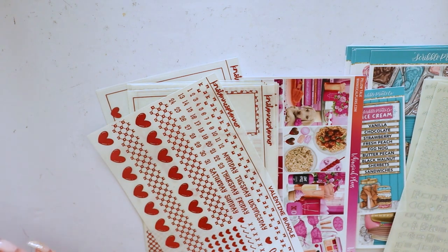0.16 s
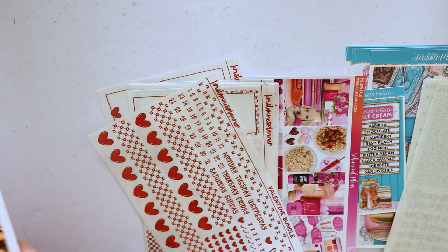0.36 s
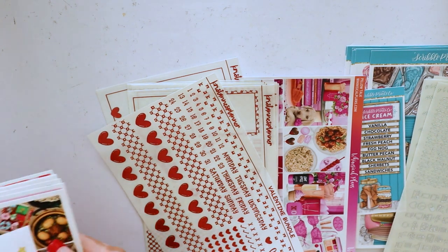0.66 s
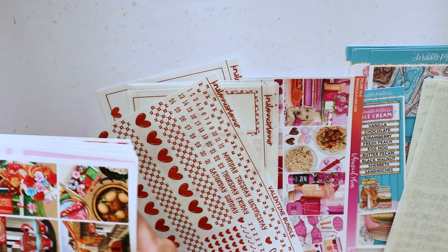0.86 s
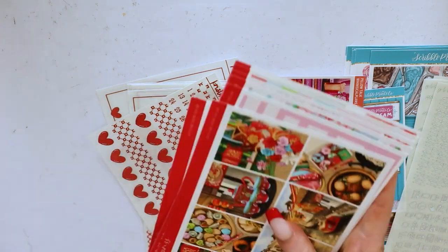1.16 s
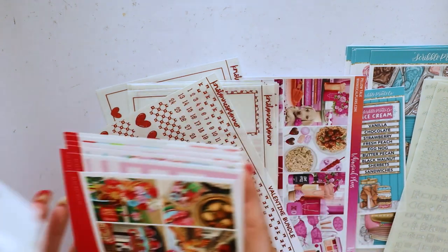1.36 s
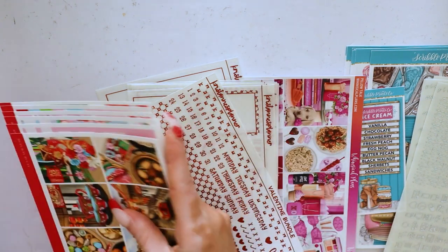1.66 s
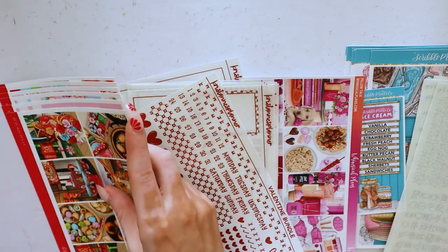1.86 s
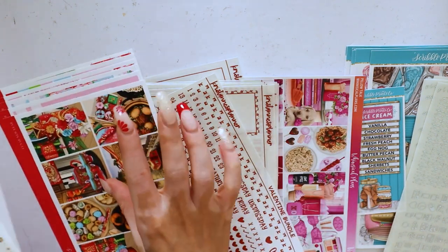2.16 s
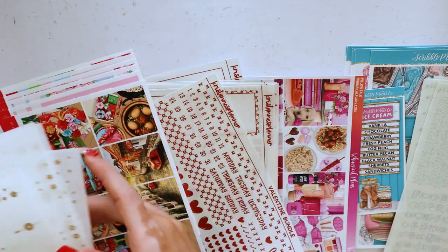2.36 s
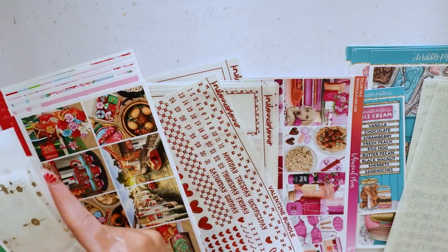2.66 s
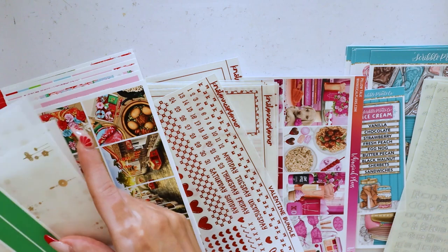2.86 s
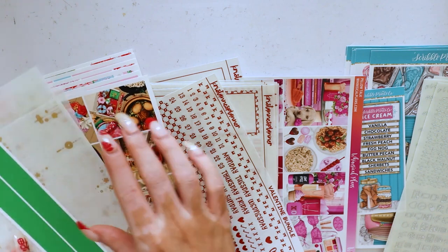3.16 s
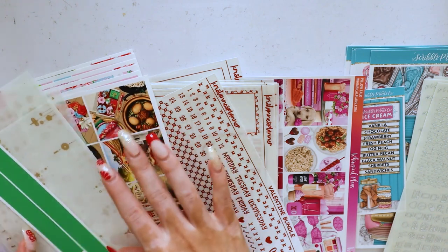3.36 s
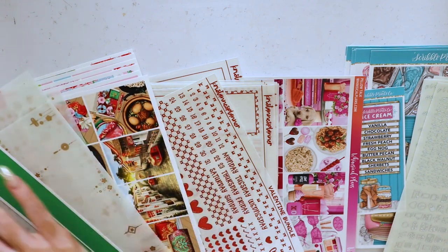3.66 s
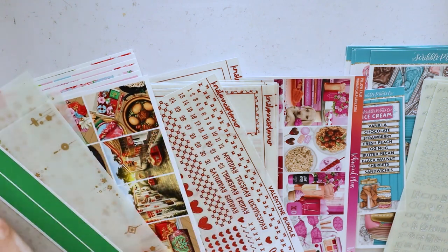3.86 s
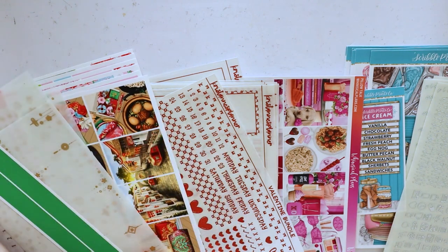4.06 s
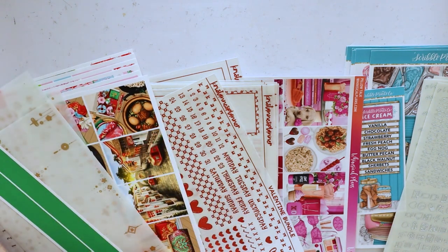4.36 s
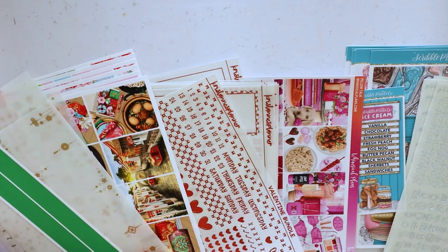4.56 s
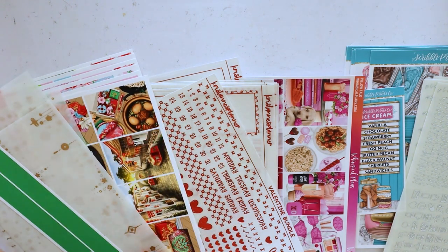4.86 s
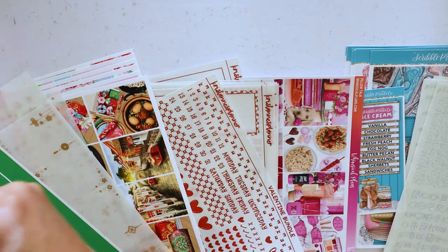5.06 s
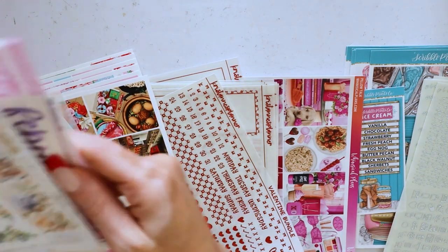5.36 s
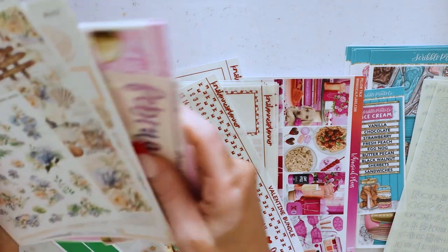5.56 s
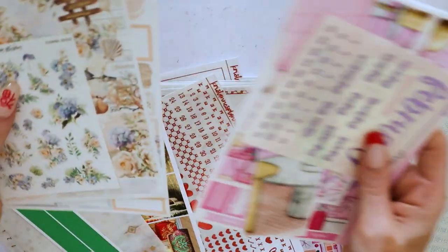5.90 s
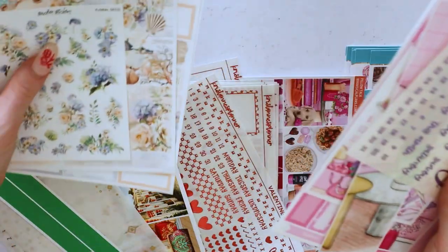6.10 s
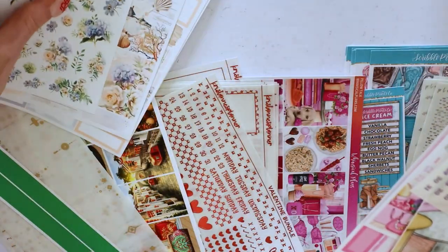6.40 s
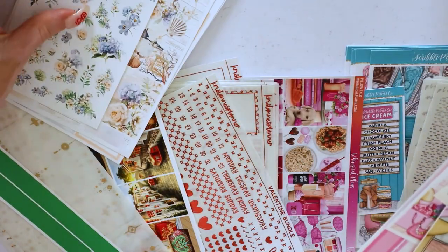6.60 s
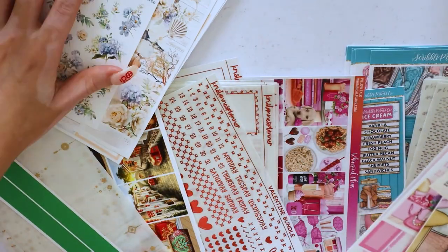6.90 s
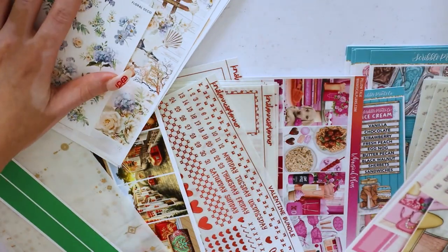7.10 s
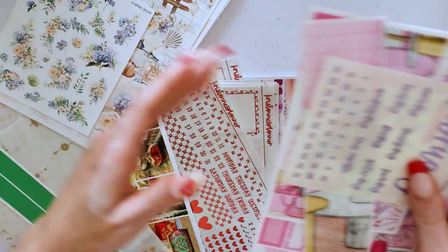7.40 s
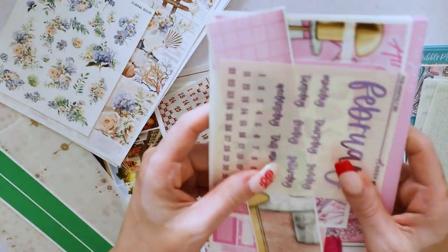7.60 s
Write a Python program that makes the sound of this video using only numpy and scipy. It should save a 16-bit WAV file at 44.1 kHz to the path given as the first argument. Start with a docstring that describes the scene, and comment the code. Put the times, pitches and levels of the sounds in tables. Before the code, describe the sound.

A small, quiet room with faint air and a barely audible low hum, heard by a wide stereo microphone close above a desk. At 0.1-0.2 s a sheet slides with a bright hiss and its edge snaps; more flicks and a short gliding pull follow at 0.5-0.7 s. Around 1.2-1.6 s a rising drag becomes a lower, hollow scuff of the whole stack, with a thin skin rasp. From 1.9 to 3.2 s edges tap and click in small clusters, with soft desk thumps near 2.2 s. A duller scuff at 3.6 s precedes a bright slap at 3.85 s and crackling pulls until 4.6 s. Mostly quiet follows, with a tick at 5.05 s. Rustles and taps return at 5.5-5.95 s; strong crisp landings come at 6.67 and 6.98 s, the latter loudest, then near silence and a light tap at 7.64 s.

```python
"""A low hum and faint air come first, with a whisper of skin on paper; then a sheet slides and its edge snaps.
Paper sticker sheets are slid over each other, fanned out and laid on a desk in a small quiet room.
Each slide is a swell of tiny slips that hiss and make the sheet resonate; freed edges are sharp pulses,
skin rasps are narrow noise bands and desk thumps are low decaying sines.
A wide stereo microphone close above the desk hears it all."""
import sys
import numpy as np
from scipy import signal
from scipy.fft import rfft, irfft, next_fast_len
from scipy.io import wavfile
from scipy.ndimage import uniform_filter1d

SR = 44100
rng = np.random.default_rng(int(sys.argv[2]) if len(sys.argv) > 2 else 0)


def wav_out(sig):
    """Save sig, one row per channel (or a flat mono array), as 16-bit PCM at SR to the path in sys.argv[1]."""
    wavfile.write(sys.argv[1], SR, np.round(np.clip(np.atleast_2d(sig).T, -1, 1) * 32767).astype(np.int16))


N = 341334

# Sheet, hiss, tap and crack levels are filter gains, ahead of the near and room gains of the microphone.

# Still air of the room. Each row: frequency in Hz, relative level in dB per Hz.
AIR_SPECTRUM = [(25, -10), (60, -6.5), (80, -16.5), (120, -13.5), (250, -23), (700, -25), (3000, -36.5),
                (12000, -49)]
# Low hum in the background. Each row: frequency in Hz, level in dB.
HUM_TONES = [(101.5, -71.5)]
# Likeness of left and right in the room's sound. Each row: frequency in Hz, correlation from -1 to 1.
ROOM_LIKENESS = [(190, .98), (1500, -.15), (10000, -.65)]
# Standing waves of the room. Each row: frequency in Hz, level in dB before ROOM_DB, 60 dB decay in seconds.
STANDING_WAVES = [(361, -63, 0.26), (476, -58, .22), (658, -54.5, 0.16), (1160, -55, 0.2),
                  (1214, -65, 0.28)]
# Lead of the nearer channel for close sound. Each row: frequency in Hz, phase in radians.
NEAR_CHANNEL_LEAD = [(1050, 0), (2000, 2.3), (10000, 2.55)]
# Directivity of the microphone. Each row: frequency in Hz, share of a source's left-right dB that it shows.
MIC_DIRECTIVITY = [(350, .05), (1400, 2.06), (10000, 0.56)]
# Where the hands work. Each row: time in seconds, left minus right in dB.
HAND_POSITION = [(.2, -8), (.8, -8), (1.3, 3.5), (1.8, -8), (3.43, -8.5), (3.6, 1.5), (3.82, 0),
                 (4.15, -13.5), (4.55, -2.5), (5.1, -7.5), (5.55, -15), (5.9, 2.5), (6.5, -6.5),
                 (6.7, -3.5), (6.98, -7.5), (7.005, 0), (7.65, 2)]
# A sheet around its resonance. Each row: ratio to the resonance, relative level in dB per Hz at focus 1.
SHEET_RESPONSE = [(.1, -42), (.45, -22), (.75, -8), (1, 0.5), (1.5, -9), (2.5, -15), (6, -32), (20, -50.5)]
# Friction of paper on paper. Each row: frequency in Hz, relative level in dB per Hz.
FRICTION_HISS = [(300, -9), (1500, -12), (3000, -4), (6000, 3), (10500, 9.5)]
# Fingers shift lightly on the held sheets. Each row: start in seconds, end in seconds, drive level in dB.
FINGER_SHIFTS = [(-.1, 0.072, -52.5), (.6, 2.2, -64), (2.605, 3.328, -65), (4.6, 6.094, -65),
                 (6.251, 6.374, -57.5)]
# A sheet is pushed a short way. Each row: peak in seconds, time scale in seconds, sheet level in dB,
# sheet resonance in Hz, hiss level in dB, focus of the resonance (higher is more taut).
SHEET_PUSHES = [(0.158, 0.074, -39, 2400, -33.5, 0.44), (0.214, 0.014, -42, 2470, -27.5, 1.8),
                (0.505, 0.063, -49.5, 1990, -33.5, 1.2), (0.171, 0.1, -56.5, 833, -53, 2.1),
                (1.122, 0.013, -66.5, 1360, -44.5, 1.6), (1.616, 0.057, -67, 1030, -78, 1.2),
                (1.932, 0.035, -47.5, 1100, -41.5, 0.4), (2.051, 0.059, -65, 4130, -47, 1.4),
                (2.145, 0.15, -67, 2320, -69, 1), (2.545, 0.052, -51.5, 4730, -49.5, 2.6),
                (2.826, 0.013, -50, 4700, -37.5, 1.3), (3.095, 0.043, -48.5, 1190, -40, 0.77),
                (4.542, 0.047, -38, 2620, -34.5, 0.72), (4.663, 0.058, -53.5, 1750, -43.5, 1.06),
                (5.55, 0.054, -56.5, 2505, -70, 1.8), (5.724, 0.11, -44.5, 5600, -32.5, 1.04),
                (5.919, 0.076, -72, 700, -50.5, 1), (6.505, 0.086, -45.5, 1780, -49, 1.1),
                (6.56, 0.07, -56, 2030, -54.5, 2.3), (6.663, 0.091, -59, 4500, -41, 1.3),
                (6.742, 0.013, -39.5, 3160, -58, 1.14), (7.67, 0.08, -64.5, 2650, -44, 6)]
# Edges that flick free. Each row: start in seconds, sheet level in dB, sheet resonance in Hz, crack level in dB.
EDGE_FLICKS = [(0.1733, -29, 3100, -31), (0.4868, -34, 2100, -32), (0.4964, -27, 2095, -51),
               (0.534, -39, 2300, -58), (0.811, -65, 2370, -36.5), (1.9095, -34.5, 890, -36.5),
               (2.2052, -43, 1365, -35), (2.536, -52.5, 1200, -38.5), (2.5665, -55, 1360, -33.5),
               (2.6288, -38, 5560, -30), (2.659, -55, 1470, -54), (2.7657, -36, 1110, -34.5),
               (3.152, -39, 1380, -39), (3.8494, -39, 1680, -49), (3.883, -47, 2080, -29.5),
               (4.295, -35, 1570, -45), (4.6879, -43, 1660, -53), (5.0561, -35, 3030, -47),
               (5.745, -32, 1046, -38), (5.945, -59.5, 7000, -44), (6.4905, -34.5, 1850, -55),
               (6.962, -35.5, 1850, -35), (6.9863, -19.5, 2380, -40), (6.9873, -17, 2130, -43),
               (6.9947, -32.5, 955, -52), (7.64, -47.5, 2500, -56)]
# Drawn sounds with a gliding resonance, one list each; the last two lists are one long pull that changes
# pitch. Each row: time in seconds, sheet level in dB before DRAG_SHEET_DB,
# hiss level in dB before DRAG_HISS_DB, sheet resonance in Hz.
GLIDING_PULLS = [
    [(1.225, -61.5, -73, 493), (1.25, -52, -67, 600), (1.275, -50.5, -50, 720)],
    [(0.52, -52, -74, 1920), (0.562, -51.5, -55, 2380), (0.7, -59.5, -57, 2840), (0.76, -98, -73.5, 2300)],
    [(3.88, -45, -56, 1970), (3.928, -41, -50, 2770), (3.998, -46.5, -49.5, 2400), (4.09, -51.5, -47, 2560),
     (4.165, -42, -40, 3070)],
    [(4.23, -45, -51, 1650), (4.29, -50, -52.5, 1620), (4.38, -64, -61, 2700), (4.48, -72, -71, 2120)],
]
# Skin dragged over a glossy sheet. Each row: peak in seconds, half length in seconds, level in dB.
SKIN_RASPS = [(1.316, 0.046, -42.5), (3.29, 0.17, -64)]
# The whole stack scuffs over the desk. Each row: peak in seconds, time scale in seconds, lower resonance
# level in dB, its frequency in Hz, upper resonance level in dB, its frequency in Hz, hiss level in dB.
STACK_SCUFFS = [(1.334, 0.091, -40, 547, -40.5, 1230, -45.5), (3.594, 0.063, -35, 482, -37.5, 1175, -73)]
# An edge lands and the sheet settles. Each row: landing in seconds, tap level in dB, sheet resonance in Hz,
# crack level in dB, settling sheet level in dB, settling hiss level in dB.
SHEET_LANDINGS = [(1.466, -60.5, 1030, -46, -57, -41.5), (1.9013, -41, 860, -42.5, -40.5, -41),
                  (2.2023, -41, 730, -34, -47.5, -52.5), (2.5736, -44.5, 1310, -26.5, -47.5, -55),
                  (2.7528, -39.5, 1150, -34, -42, -45), (3.149, -36, 1360, -33, -46, -37),
                  (3.4314, -37.5, 3330, -34.5, -63, -51), (3.81, -35, 2140, -22, -41, -29.5),
                  (3.8466, -18.5, 1980, -25.5, -21.5, -51), (4.2147, -28.5, 1220, -46, -40.5, -47),
                  (4.515, -27, 1830, -27.5, -35.5, -40), (5.0554, -38, 950, -39.5, -47.5, -35.5),
                  (5.7174, -28, 920, -28.5, -45.5, -28.5), (6.662, -16, 2216, -41, -28, -54),
                  (6.6704, -30, 730, -32.5, -42, -65), (6.9779, -16, 2200, -27, -19, -28),
                  (7.6411, -39.5, 950, -46, -45, -59)]
# Hand or stack meets the desk. Each row: start in seconds, gain in dB.
DESK_BLOWS = [(1.906, -57.5), (2.208, -39.5), (2.237, -36), (3.152, -42.5), (3.85, -47.5), (6.669, -38),
              (6.697, -53.5)]
# Resonances of the desk. Each row: frequency in Hz, relative level in dB, 60 dB decay in seconds.
DESK_MODES = [(101.3, -18.5, 0.33), (137.6, 0, .2)]

AIR_DB, ROOM_T60_S, ROOM_DB, NEAR_DB = -65.5, 0.15, -0.5, -3
SHEET_RIPPLE_DB, SHEET_MODE_GAP_HZ = 1.8, 230   # random bumps in a sheet's response
SPEED_UP_SHARE = 0.6   # part of a push's time scale spent gathering speed
DRAG_SHEET_DB, DRAG_HISS_DB, DRAG_FADE_S = 1, 9, 0.069
DRAG_FOCUS, DRAG_RUMBLE_DB = 0.97, -14
RASP_BAND_HZ = (5200, 6100)
STACK_FOCUS = 0.87   # how narrowly the stack rings
SETTLE_ATTACK_S, SETTLE_HOLD_S, SETTLE_DECAY_S = 0.027, 0.0037, 0.026
TAP_SWELL_DB, TAP_SWELL_S = -9, 0.0066   # soft swell and fade around each tap
TREBLE_EDGE_HZ, CUTOFF_HZ = 11560, 15600


def from_db(db):
    """Decibels to gain."""
    return 10 ** (np.asarray(db) / 20)


def rms_one(x):
    """Scale to unit rms."""
    return x / np.sqrt(np.mean(x ** 2) + 1e-20)


def bins(size):
    """Frequencies of a spectrum of this many samples, in Hz."""
    return np.maximum(np.fft.rfftfreq(size, 1 / SR), 1)


def at_hz(points, hz):
    """Read a table on a log-frequency axis."""
    points = np.array(points)
    return np.interp(np.log(hz), np.log(points[:, 0]), points[:, 1])


def add(out, x, s):
    """Mix x into out from time s on."""
    at = int(round(s * SR))
    first, last = max(at, 0), min(at + x.shape[-1], N)
    if last > first:
        out[..., first:last] += x[..., first - at:last - at]


def diffuse(size):
    """Spectrum of white stereo noise, alike in the bass and opposed in the treble."""
    alike = np.clip(at_hz(ROOM_LIKENESS, bins(size)), -1, 1)
    mid, side = rfft(rng.standard_normal((2, size)))
    return (np.sqrt(1 + alike) * mid + np.sqrt(1 - alike) * side * [[1], [-1]]) / np.sqrt(2)


def background(waver=0.56):
    """Faint air noise and a wavering hum."""
    t = np.arange(N) / SR
    air = from_db(AIR_DB) * rms_one(irfft(diffuse(N) * from_db(at_hz(AIR_SPECTRUM, bins(N))), N))
    for hz, db in HUM_TONES:
        drift = rng.standard_normal(80) + 1j * rng.standard_normal(80)
        sway = 1 + waver * signal.resample(drift, N)
        air = air + from_db(db) * rms_one(np.real(sway * np.exp(2j * np.pi * hz * t)))
    return air


def ring(modes):
    """Half a second of decaying sines."""
    t = np.arange(SR // 2) / SR
    return sum(from_db(db - 60 * t / t60) * np.sin(2 * np.pi * hz * t) for hz, db, t60 in modes)


def room_echo(x):
    """Reflections off moving paper never repeat: the room stores energy and gives it back as a dying wash."""
    keep = from_db(-120 / (ROOM_T60_S * SR))   # energy kept per sample
    stored = signal.lfilter([0, 1 - keep], [1, -keep], x ** 2 + 1e-20)
    wash = rms_one(irfft(diffuse(len(x)), len(x)))
    return from_db(ROOM_DB) * np.sqrt(stored) * wash


def place(x, pan_db, near_db):
    """Near sound, standing waves and echo reach the two directional channels of the microphone."""
    size = next_fast_len(len(x) + SR // 2, True)
    x = np.pad(x, (0, size - len(x)))
    hz, sides = bins(size), np.array([[1], [-1]])
    leader = 1 if pan_db < 0 else -1   # the louder side hears it first
    near = from_db(near_db) * np.exp(-.5j * leader * sides * at_hz(NEAR_CHANNEL_LEAD, hz))
    standing = from_db(ROOM_DB) * rfft(ring(STANDING_WAVES), size)
    lean = from_db(sides * pan_db * at_hz(MIC_DIRECTIVITY, hz) / 2)
    lean = lean / np.sqrt(np.mean(lean ** 2, axis=0))
    heard = rfft(x) * (near + standing) + rfft(room_echo(x))
    return irfft(heard * lean, size)[:, :-SR // 10]


def pan_at(s):
    """Left-right balance of the hands at that moment."""
    return np.interp(s, *np.transpose(HAND_POSITION))


def colour(x, body_db, hz, rub_db, focus=1, size=1024):
    """A sheet's resonance and hiss as one causal filter; higher focus is narrower, its ripple is drawn anew."""
    sheet = from_db(body_db) * rms_one(from_db(focus * at_hz(SHEET_RESPONSE, bins(size) / hz)))
    hiss = from_db(rub_db) * rms_one(from_db(at_hz(FRICTION_HISS, bins(size))))
    ripple = np.interp(bins(size) / SHEET_MODE_GAP_HZ, np.arange(size), rng.uniform(-1, 1, size))
    ripple = rms_one(ripple - uniform_filter1d(ripple, size=16))
    modes = rms_one(from_db(SHEET_RIPPLE_DB * ripple))
    # folding the cepstrum gives minimum phase: the filter answers at once
    cepstrum = irfft(np.log(np.hypot(sheet, hiss) * modes))
    cepstrum[1:size // 2] *= 2
    cepstrum[size // 2 + 1:] = 0
    response = irfft(np.exp(rfft(cepstrum)))
    return signal.fftconvolve(x, response[None], axes=1)


def slips(size, per_s, spread_db):
    """Fibres catch and let go at random: many small slips, a few large."""
    chance, strength, sign = rng.random((3, size))
    sizes = from_db(spread_db * np.minimum(-np.log(1 - strength), 4))
    return rms_one((chance < per_s / SR) * sizes * np.sign(sign - .5))


def handling(tick_share=1.0, ticks_per_s=90, tick_spread_db=6, sheet_db=-15, sheet_hz=1300, pan_db=-7):
    """A faint, unsteady whisper of skin on paper, with stray ticks as the held sheets flex."""
    t = np.arange(N) / SR
    level = 0
    for start, end, db in FINGER_SHIFTS:
        held = 1. * ((t > start) & (t < end))
        level = level + from_db(db) * uniform_filter1d(held, size=SR // 20)
    pressure = rms_one(np.abs(signal.resample(rng.standard_normal(80), N)))
    ticks = tick_share * slips(N, ticks_per_s, tick_spread_db)
    drive = level * pressure * rms_one(ticks + .5 * rng.standard_normal(N))
    return colour(place(drive, pan_db, NEAR_DB), sheet_db, sheet_hz, 0)[:, :N]


def friction(speed, grain=0.9, flutter_db=5.5, flutter_s=.006):
    """Slips and smooth rubbing under a fluttering grip, as strong as the sheet is fast."""
    size = len(speed)
    grip = np.interp(np.arange(size) / SR / flutter_s, np.arange(256), rng.standard_normal(256))
    drive = grain * slips(size, per_s=4000, spread_db=7.5) + .5 * rng.standard_normal(size)
    return speed * rms_one(drive * from_db(flutter_db * grip))


def rumble(speed, top_hz=140):
    """Rubbing also shakes the desk a little: low-passed noise that follows the speed."""
    desk_pass = signal.butter(2, top_hz, fs=SR, output="sos")
    return speed * rms_one(signal.sosfilt(desk_pass, rng.standard_normal(len(speed))))


def rub(speed, s, body_db, hz, rub_db, focus, rumble_db):
    """One movement drives the sheet's resonance, the hiss and a rumble in the desk."""
    out = colour(place(friction(speed), pan_at(s), NEAR_DB), body_db, hz, rub_db, focus)
    out[:, :len(speed)] += from_db(max(body_db, rub_db) + rumble_db) * rumble(speed)
    return out


def push(t, length):
    """Speed of a push around its peak: it swells and fades."""
    share = np.clip(SPEED_UP_SHARE, .1, .9)
    swell = (t / (share * length)) ** 3
    fade = -(t / ((1 - share) * length)) ** 2
    return np.exp(np.where(t < 0, swell, fade))


def slides():
    """Short pushes of single sheets: friction drives one resonance and the hiss."""
    out, t = np.zeros((2, N)), np.arange(-SR // 4, SR // 4) / SR
    for s, length, body_db, hz, rub_db, focus in SHEET_PUSHES:
        add(out, rub(push(t, length), s, body_db, hz, rub_db, focus, rumble_db=-26.5), s + t[0])
    return out


def snap(s, body_db, hz, crack_db, pulse_db=18.5, rattle=0.28, rattle_s=0.001, near_db=6.0):
    """An edge lets go with one sharp pulse, then rattles for a few milliseconds."""
    t = np.arange(SR // 100) / SR
    flap = (t == 0) + rattle * rng.standard_normal(len(t)) * np.exp(-t / rattle_s) * (t > 0)
    pulse = from_db(pulse_db) * flap / np.linalg.norm(flap)
    return colour(place(pulse, pan_at(s), near_db), body_db, hz, crack_db)


def snaps():
    """Sharp flicks of an edge, alone or within slides and landings."""
    out = np.zeros((2, N))
    for s, body_db, hz, crack_db in EDGE_FLICKS:
        add(out, snap(s, body_db, hz, crack_db), s)
    return out


def drags(size=2048):
    """Crackling pulls, long or short, with a moving resonance; one is the rising lead-in to a stack scuff."""
    out, window = np.zeros((2, N)), signal.get_window("hann", size)
    for curve in GLIDING_PULLS:
        times, *controls = np.transpose(curve)
        t = times[0] + np.arange(-SR // 10, SR // 2) / SR
        inside_s = np.minimum(t - times[0], times[-1] - t)
        speed = np.clip(inside_s / DRAG_FADE_S + 1, 0, 1)
        sound = place(friction(speed, grain=0.6, flutter_db=3.3), pan_at(times.mean()), NEAR_DB)
        rumble_db = np.interp(t, times, controls[0]) + DRAG_RUMBLE_DB
        add(out, rumble(speed * from_db(rumble_db)), t[0])
        # overlapping grains, each with its own resonance
        for at in range(0, len(t), size // 2):
            middle_s = t[at] + size / 2 / SR
            body_db, rub_db, hz = (np.interp(middle_s, times, c) for c in controls)
            grain = sound[:, at:at + size] * window
            grain = colour(grain, body_db + DRAG_SHEET_DB, hz, rub_db + DRAG_HISS_DB, DRAG_FOCUS)
            add(out, grain, t[at])
    return out


def rasps():
    """Fast, nearly regular slips of skin give a narrow high rasp, made here from band-passed noise."""
    t = np.arange(N) / SR
    level = sum(from_db(db) * np.exp(-((t - s) / half) ** 2) for s, half, db in SKIN_RASPS)
    narrow = signal.butter(2, RASP_BAND_HZ, "band", fs=SR, output="sos")
    return level * rms_one(signal.sosfilt(narrow, irfft(diffuse(N), N)))


def scuffs():
    """Short pushes of the whole stack, which rings at two low resonances."""
    out, t = np.zeros((2, N)), np.arange(-SR // 4, SR // 4) / SR
    for s, length, low_db, low_hz, high_db, high_hz, rub_db in STACK_SCUFFS:
        for body_db, hz in (low_db, low_hz), (high_db, high_hz):
            add(out, rub(push(t, length), s, body_db, hz, rub_db, STACK_FOCUS, rumble_db=-17.5), s + t[0])
    return out


def landings():
    """An edge taps down within a soft swell; the rest of the sheet skids to a halt with the same resonance."""
    out, t = np.zeros((2, N)), np.arange(-SR // 10, SR // 4) / SR
    speed = np.clip(t / SETTLE_ATTACK_S, 0, 1) * np.exp(-np.maximum(t - SETTLE_HOLD_S, 0) / SETTLE_DECAY_S)
    speed = speed + from_db(TAP_SWELL_DB) * np.exp(-abs(t) / TAP_SWELL_S)
    for s, tap_db, hz, crack_db, body_db, rub_db in SHEET_LANDINGS:
        add(out, snap(s, tap_db, hz, crack_db), s)
        skid = rub(speed, s + SETTLE_DECAY_S, body_db, hz, rub_db, focus=0.76, rumble_db=-28.5)
        add(out, skid, s + t[0])
    return out


def desk(soft_hz=260):
    """Soft blows wake only the low modes of the desk."""
    out = np.zeros(N)
    boom = signal.sosfilt(signal.butter(2, soft_hz, fs=SR, output="sos"), ring(DESK_MODES))
    for s, db in DESK_BLOWS:
        add(out, from_db(db) * boom, s)
    return out


def scene():
    """Paper, hands, desk and room together."""
    room_and_hands = background() + handling()
    paper = slides() + snaps() + drags() + rasps() + scuffs() + landings()
    return room_and_hands + paper + desk()


def record(dry):
    """The loudest peaks are rounded, the microphone's treble falls away steeply, and the top is cut."""
    rounded = .78 * np.tanh(dry / .78)
    dull = signal.sosfilt(signal.butter(16, TREBLE_EDGE_HZ, fs=SR, output="sos"), rounded)
    return signal.sosfilt(signal.ellip(10, .1, 80, CUTOFF_HZ, fs=SR, output="sos"), dull)


dry = scene()
out = record(dry)
wav_out(out)
```